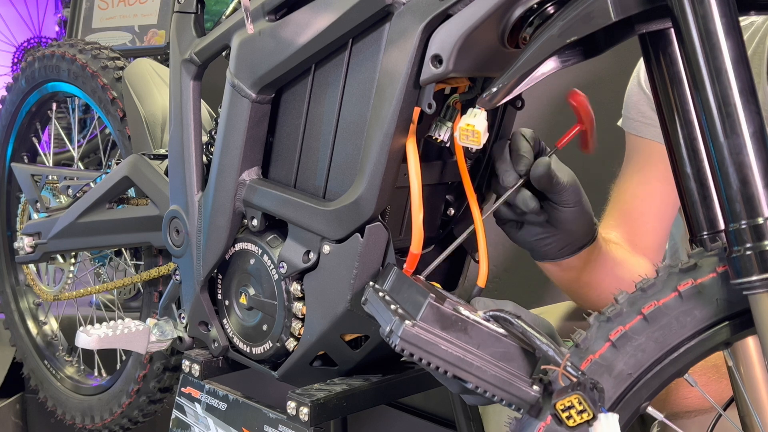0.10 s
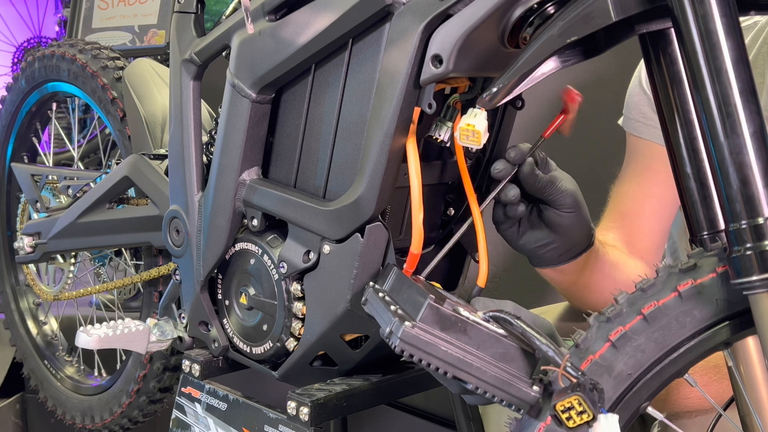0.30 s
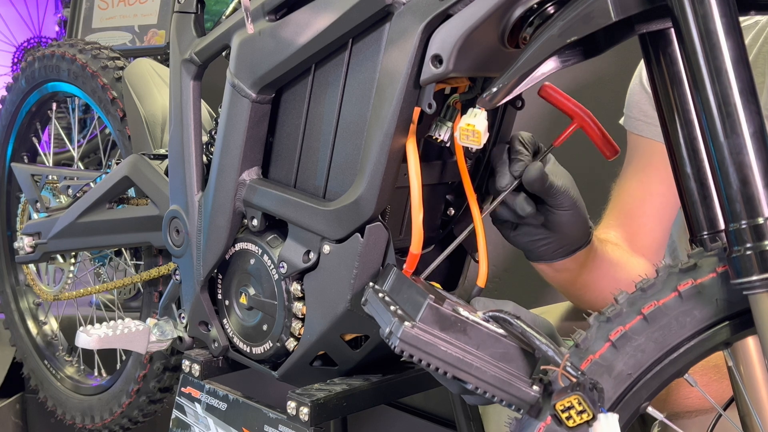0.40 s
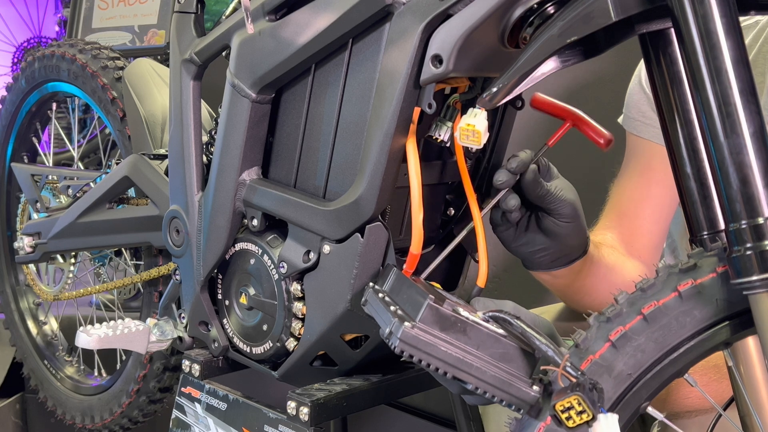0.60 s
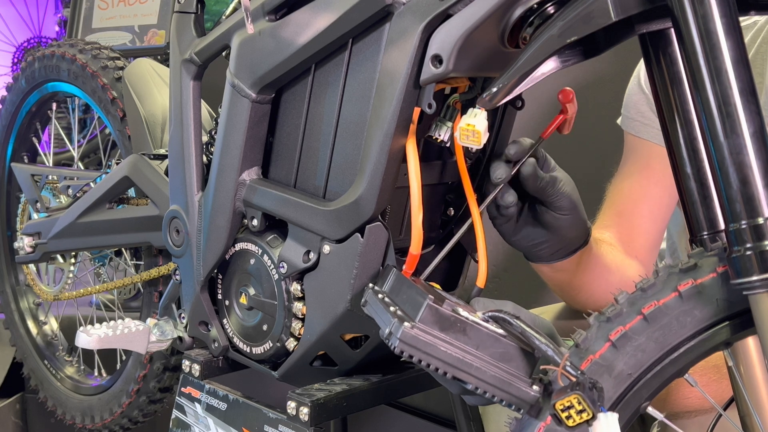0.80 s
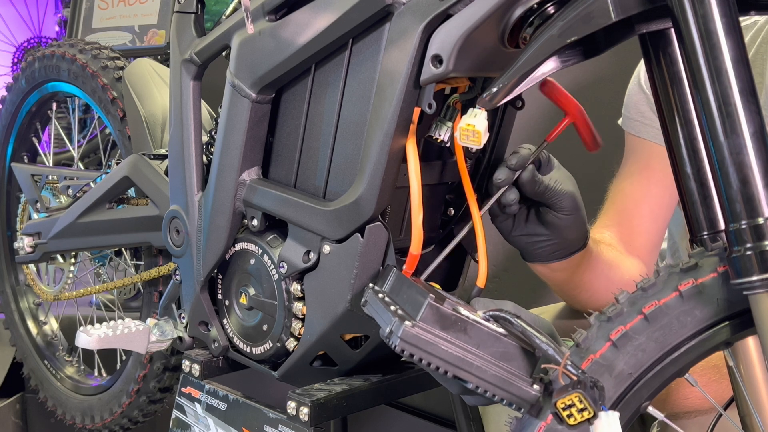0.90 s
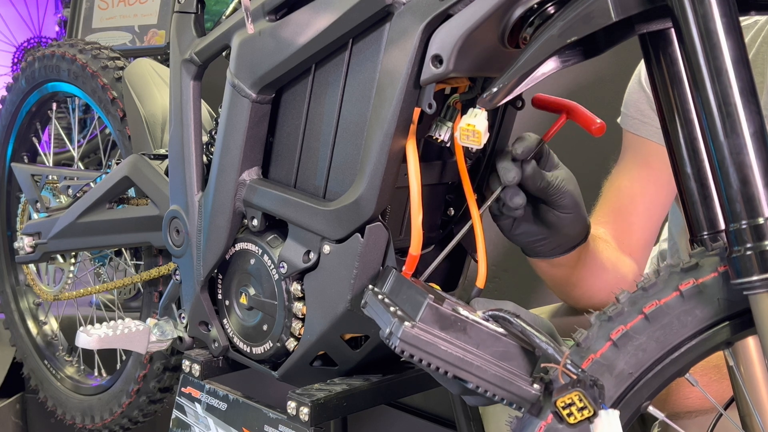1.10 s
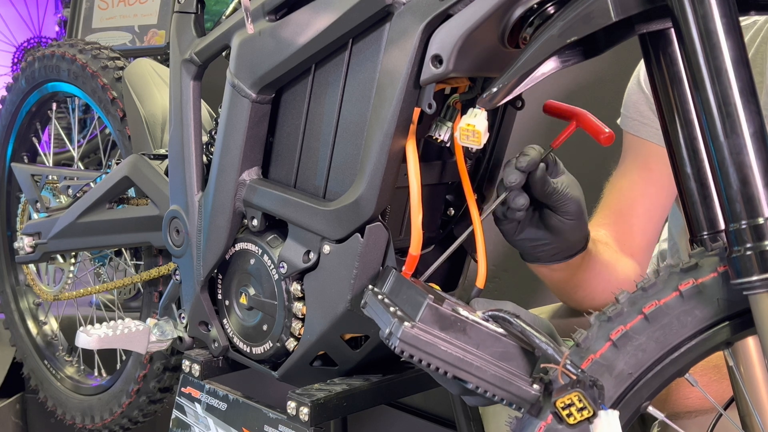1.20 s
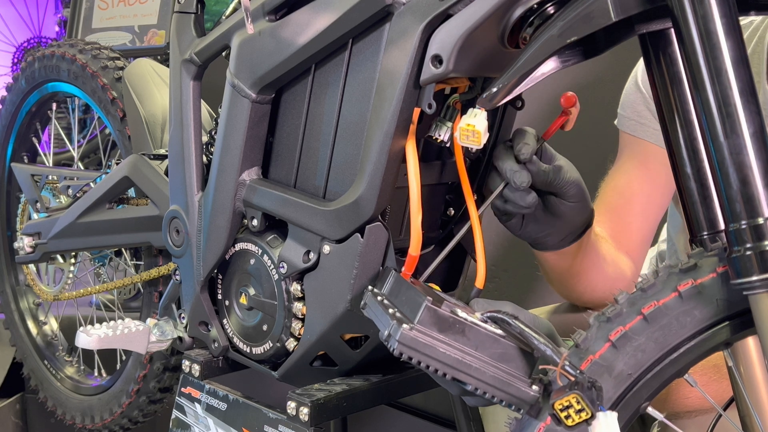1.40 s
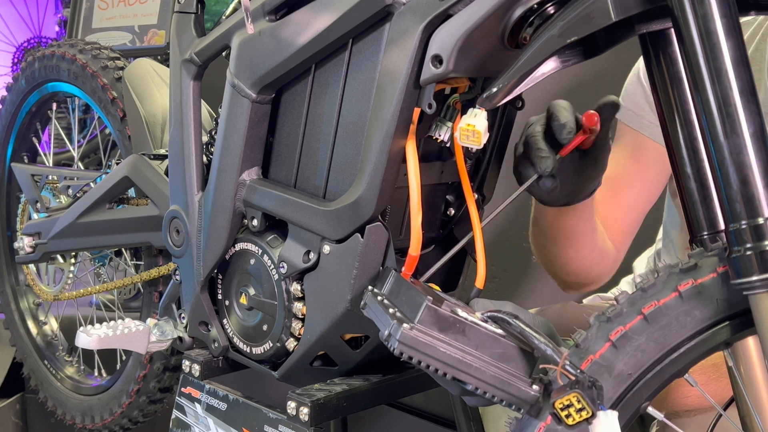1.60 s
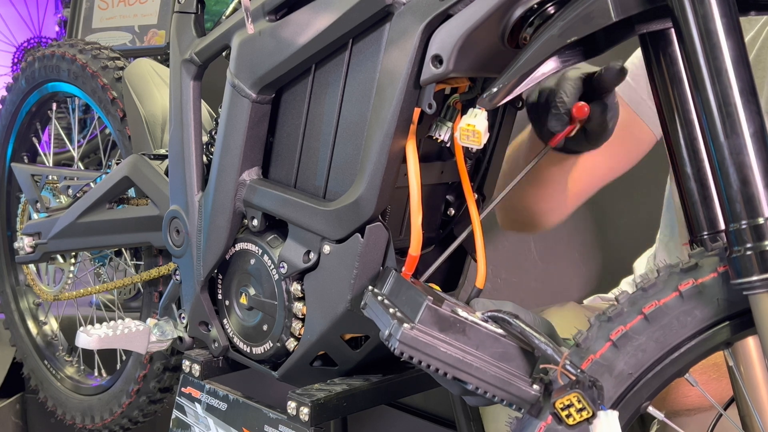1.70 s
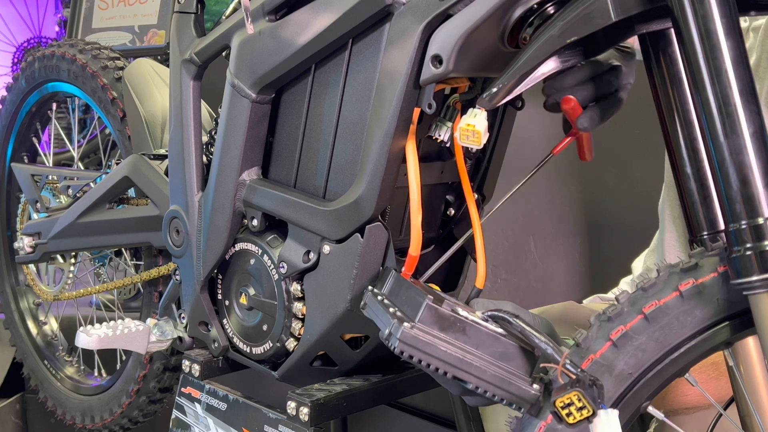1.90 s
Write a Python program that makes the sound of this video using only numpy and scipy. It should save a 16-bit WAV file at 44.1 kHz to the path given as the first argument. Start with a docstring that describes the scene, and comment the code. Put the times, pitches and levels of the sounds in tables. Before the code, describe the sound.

A steel T-handled wrench knocks and ticks in a motorbike bolt. A faint scrape and tick at 0.1 seconds lead to sharper knocks, the loudest near 0.4. Lighter, briefly ringing clicks scatter until 1.2, with barely audible squeaks around 0.1 and 0.9. Three faint ticks come near 1.6, and a soft glove rustle near 1.9. A low, steady workshop hiss lies beneath.

```python
"""A quiet workshop, where a gloved hand twirls a long T-handled key on a motorbike bolt.
The steel tip knocks and ticks in its socket, ringing the key and the parts around it, and the
shaft bumps dully. The tip scrapes once and squeaks twice as it binds and slips; at the end the
glove rustles on the handle. A microphone with no bass hears it all over a steady hiss."""
import sys
import numpy as np
from scipy import signal
from scipy.fft import rfft, irfft
from scipy.io import wavfile
from scipy.ndimage import uniform_filter1d

SR = 44100
rng = np.random.default_rng(int(sys.argv[2]) if len(sys.argv) > 2 else 0)


def transcribe(signal):
    """Save signal, clipped to [-1, 1], as a 16-bit WAV file at the path in sys.argv[1]."""
    frames = np.atleast_2d(signal).T
    limited = np.clip(frames, -1, 1)
    pcm = np.round(limited * 32767).astype(np.int16)
    wavfile.write(sys.argv[1], SR, pcm)


N = 83790


def amp(db):
    return 10 ** (np.asarray(db) / 20)


def unit_rms(x):
    return x / np.sqrt(np.mean(x ** 2))


def curve_at(hz, points_hz, values):
    """Read a curve drawn on a log-frequency axis."""
    return np.interp(np.log(hz), np.log(points_hz), values)


def resonate(x, hz, width_hz):
    """Two passes through one resonance: steep skirts, gain 1 at the centre."""
    b, a = signal.iirpeak(hz, hz / width_hz, fs=SR)
    return signal.lfilter(b, a, signal.lfilter(b, a, x))


def noisy_modes(noise, hz, relative_width):
    """Blur each mode into a band of noise around its pitch."""
    return np.array([unit_rms(resonate(row, f, relative_width * f)) for row, f in zip(noise, hz[:, 0])])


def add(out, start_s, x):
    i = int(start_s * SR)
    out[i:i + len(x)] += x[:len(out) - i]


def decay(t, t60):
    return np.exp(-np.log(1000) * t / t60)


def tip_taps():
    """The tip strikes its socket: the modes crackle while steel touches steel, then ring and rattle."""
    # Each row: start in seconds, level in dB, ten band gains in dB, pitch factor for the low modes,
    # ring length factor, contact time in seconds, rattle gain in dB.
    strikes = [(0.1206, -20, -42, -36, -22.5, -32, -38, -13.5, -16, -7, -16.5, -40, 0.93, 1, 0.0043, -6.5),
               (0.2357, -27, -26, -16.5, -26, -44, -15.5, -30, -42, -9.5, -28, -19, 1.06, 1, 0.0023, -14),
               (.2380, -20, -18, -4, -12, -9, -23.5, -21.5, -22.5, -17, -47, -51, .95, 0.55, 0.0021, -11.5),
               (0.248, -34.5, -17.5, -13, -32, -30, -9.5, -19, -5.5, -16, -26, -31, 0.76, 1, 0.0035, -11),
               (0.382, -1, -17, -15.5, -20, -18, -17.5, -20.5, -15, -11.5, -28, -45, .99, 0.65, 0.0023, -11.5),
               (0.541, -31.5, -11.5, -13.5, -22.5, -20, -18.5, -12, -6, -47, -31, -39, 1.06, 1, 0.0024, -4.5),
               (.7960, -46.5, -3, 4.5, -8.5, -28, -17, -34, -20, -16, -42, -34, 1.16, 0.27, 0.00082, -18),
               (0.8576, -41.5, -17, -15, -12.5, -16, -18, -18.5, -13, -43, -24, -44, 0.85, 0.69, 0.0019, -5),
               (.9220, -64, -7, -20, 3, -27, -19, -17, -22, -36, -30, -47, 1.01, 0.42, 0.0028, -20),
               (0.981, -46.5, -32, -9, -12, -18, -30, -22, -14, -23, -9, -28, 1.5, 0.46, 0.00094, -17),
               (.9960, -60, -18, -14, -5, -14, -20, -23, -25, -18, 5, -21, 1.07, 0.51, 0.0011, -14),
               (1.006, -38.5, -18, -14.5, -19, -8.5, -42, -10, -13.5, -20, -13, -30, 1.05, 0.47, 0.0016, -10),
               (1.1202, -28.5, -21.5, -13, -14, -30.5, -9, -14, -15, -14, -25, -36, 1.012, 0.68, 0.0078, -7.5),
               (1.198, -51.5, -17, -13, -16, -5, -10, -18, -22, -23, -30, -33, 1.5, 0.58, 0.0018, -19),
               (1.5390, -51, -24, -17, -12, -1, -28, -10, -13, -22, -28, -40, 1.2, .6, 0.0031, -24),
               (1.5870, -55, -36, -10, -28.5, -12, -13, -20, -12, -19, -34, -27, 1.02, 0.52, 0.0029, -19),
               (1.6240, -51.5, -34, -18, -14.5, -18, -23, -18, -15, -12, -20, -36, 1.3, 0.89, 0.0054, -13)]
    # The centres of those ten bands in Hz.
    bands_hz = [730, 1100, 1600, 2300, 3500, 5200, 7200, 10300, 12300, 14500]
    # The modes of key and parts. Each row: base pitch in Hz, gain in dB, base t60 in seconds.
    modes = [(677.7, 2, .04), (1009, 3.24, 0.041), (1250, -6.5, 0.0083), (1474, -6.5, 0.15),
             (1587, -2, 0.032), (1977, -13.5, 0.029), (2429, -4.5, .03), (2782, -7.5, 0.034),
             (3086, -2, .04), (3617, -7, 0.035), (3950, -4.5, .022), (4550, -4, .025), (5300, -5, .025),
             (6050, -1, 0.033), (6574, -10.5, 0.024), (7590, -1, 0.013), (8920, -12, 0.0091),
             (10620, 0.5, 0.0072), (12470, 7.5, .018), (14000, 12, .012)]
    # The colour of the rattle. Each row: frequency in Hz, gain in dB, t60 in seconds.
    rattle_curve = [(700, -7.5, 0.086), (1100, -3.4, 0.15), (1600, 10, 0.088), (3200, -1.45, 0.13),
                    (7000, -9.5, 0.12), (12000, -11, 0.14)]
    rise_s, rattle_rise_s, scatter_db, detune = 0.00063, 0.005, 4.5, 0.012
    out, t = np.zeros(N), np.arange(6000) / SR
    hz, mode_db, t60 = np.array(modes).T[:, :, None]
    low, clean, glassy = hz < 1400, hz < 1800, hz > 5000
    tail_hz, tail_db, tail_t60 = np.array(rattle_curve).T
    tail_age = t / curve_at(hz, tail_hz, tail_t60)
    rattle_envelope = (1 - np.exp(-t / rattle_rise_s)) * decay(tail_age ** 0.94, 1)
    attack = 1 - np.exp(-(t / rise_s) ** 2)
    for start, level_db, *bands_db, pitch, length, contact_s, rattle_db in strikes:
        level_draw, phase_draw, pitch_draw = rng.standard_normal((3, len(hz), 1))
        noise = rng.standard_normal((len(hz), len(t)))
        tuned_hz = hz * np.where(low, pitch, np.where(glassy, 1 + detune * pitch_draw, 1))
        phase = np.where(clean, 0, 9 * phase_draw)
        ring = np.sin(2 * np.pi * tuned_hz * t + phase) * amp(scatter_db * level_draw - 7 * glassy)
        ring *= decay(np.maximum(t - contact_s, 0), t60 * length)  # held until the contact ends
        crackle = noisy_modes(noise, tuned_hz, relative_width=0.27) * amp(np.where(clean, 0.5, -1.5))
        crackle *= np.exp(-(t / contact_s) ** 4)
        rattle = noisy_modes(noise, tuned_hz, relative_width=0.14) * rattle_envelope
        rattle *= amp(rattle_db + curve_at(hz, tail_hz, tail_db))
        balance = amp(mode_db + curve_at(hz, bands_hz, bands_db))
        tap = np.sum(balance * (ring + crackle + rattle), axis=0)
        add(out, start, amp(level_db + 1) * attack * tap)
    return out


def shaft_bumps():
    """Each bump of the shaft sounds one dull, quickly damped ring."""
    # Each row: start in seconds, level in dB, pitch in Hz, t60 in seconds.
    bumps = [(0.031, -50, 1023, 0.1), (.082, -42.5, 1095, 0.07), (0.093, -37, 965, 0.035),
             (.102, -32.5, 1036, 0.023), (0.111, -31.5, 1066, 0.027), (0.15, -41, 964, 0.057),
             (0.2284, -39, 1046, 0.12), (0.2355, -16, 1240, 0.025), (0.3825, -6.5, 1062, 0.027),
             (0.412, -16, 1130, 0.01), (.429, -32.5, 999, 0.041), (0.443, -35.5, 1037, 0.058)]
    rise_s = 0.0007
    out, t = np.zeros(N), np.arange(4000) / SR
    attack = 1 - np.exp(-(t / rise_s) ** 2)
    for start, level_db, hz, t60 in bumps:
        add(out, start, amp(level_db) * attack * decay(t, t60) * np.sin(2 * np.pi * hz * t))
    return out


def tip_squeaks():
    """The tip binds and slips: a short held tone with a fading overtone."""
    # Each row: start and length in seconds, pitch in Hz, level in dB, overtone gain in dB.
    squeaks = [(0.127, .018, 1516, -51, 6), (0.862, .019, 1487, -45.5, -2)]
    edge_s, overtone_ratio = 0.0026, 2.15
    out = np.zeros(N)
    for start, length, hz, level_db, overtone_db in squeaks:
        t = np.arange(int(length * SR)) / SR
        gate = np.clip(np.minimum(t, length - t) / edge_s, 0, 1)
        phase = 2 * np.pi * hz * t
        overtone = amp(overtone_db) * decay(t, t60=0.061) * np.sin(overtone_ratio * phase)
        add(out, start, amp(level_db) * gate * (np.sin(phase) + overtone))
    return out


def scrape_and_rustle():
    """Gritty friction through high resonances: the key in its socket, later the glove on the handle."""
    # Two envelopes, key then glove. Each point: time in seconds, level in dB.
    envelopes = [
        [(.075, -71), (.09, -50.5), (.105, -52.5), (.118, -46), (.135, -46.5), (.155, -49.5), (.175, -81)],
        [(1.845, -94), (1.855, -63), (1.876, -54), (1.89, -65), (1.9, -68)],
    ]
    # The resonances of key and glove. Each row: centre in Hz, width per pass in Hz, gain in dB.
    key_rings = [(7400, 900, 10.7), (10400, 3900, 5.5), (11600, 1500, -16), (6000, 2900, -0.5),
                 (14500, 2600, -2)]
    glove_rings = [(12910, 2500, 5.5), (10700, 1200, -5), (7210, 2000, 0.5)]
    grit_db, grain_samples = 0.8, 64
    out, t = np.zeros(N), np.arange(N) / SR
    for envelope, rings in zip(envelopes, (key_rings, glove_rings)):
        noise = rng.standard_normal(N)
        grains = np.repeat(rng.standard_normal(N // grain_samples + 1), grain_samples)[:N]
        grit = noise * amp(grit_db * grains)
        friction = unit_rms(sum(amp(db) * resonate(grit, hz, width) for hz, width, db in rings))
        times, levels_db = np.array(envelope).T
        out += amp(np.interp(t, times, levels_db, left=-120, right=-120)) * friction
    return out


def room_hiss():
    """A steady bed of room and microphone noise that flickers a little."""
    # The colour of the hiss. Each row: frequency in Hz, relative spectral density in dB.
    spectrum = [(88, -68), (150, -34), (183, -55.5), (227, -26.5), (317, -39.5), (378, -28.5), (479, -1),
                (571, -6.5), (1140, -4.5), (1530, -6), (2500, -8.5), (5930, -21), (12000, -27),
                (15300, -37), (16500, -55)]
    level_db, flicker_db = -57.5, 0.44
    flicker = unit_rms(uniform_filter1d(rng.standard_normal(N), size=600))
    noise = amp(flicker_db * flicker) * rng.standard_normal(N)
    hz = np.maximum(np.fft.rfftfreq(N, 1 / SR), 1)
    colour = amp(curve_at(hz, *np.array(spectrum).T))
    return amp(level_db) * unit_rms(irfft(rfft(noise) * colour, N))


def scene():
    """Close sounds round off at the microphone's ceiling and lose their bass; the hiss lies beneath."""
    ceiling, low_cut_hz = 1.05, 467
    close = tip_taps() + shaft_bumps() + tip_squeaks() + scrape_and_rustle()
    rounded = ceiling * np.tanh(close / ceiling)
    low_cut = signal.butter(4, low_cut_hz, "high", fs=SR, output="sos")
    return (signal.sosfiltfilt(low_cut, rounded) + room_hiss())[None]


def record(dry):
    """A steep low-pass takes off the very top."""
    top_hz = 16000
    return signal.sosfilt(signal.ellip(8, .2, 70, top_hz, fs=SR, output="sos"), dry)


dry = scene()
out = record(dry)
transcribe(out)
```